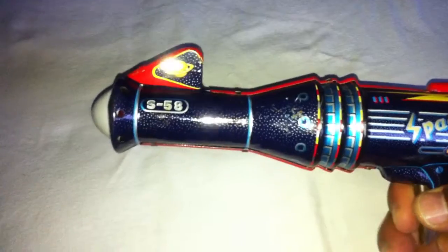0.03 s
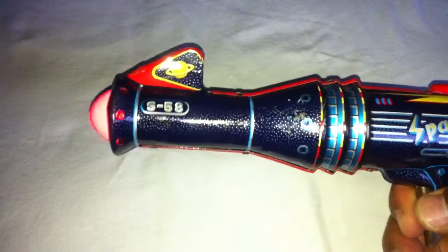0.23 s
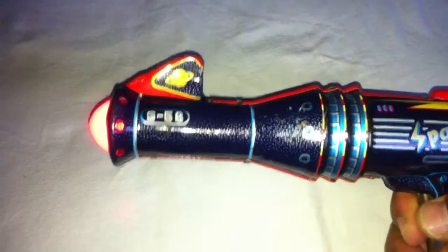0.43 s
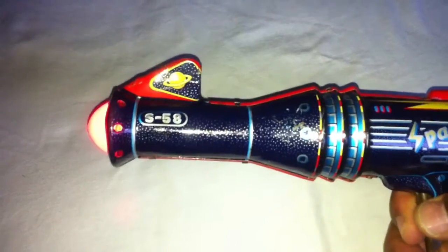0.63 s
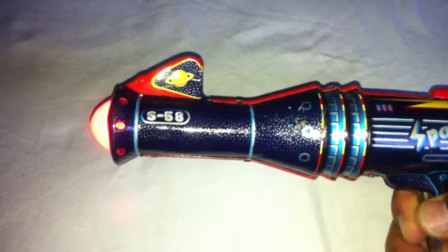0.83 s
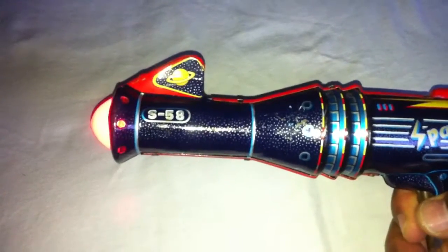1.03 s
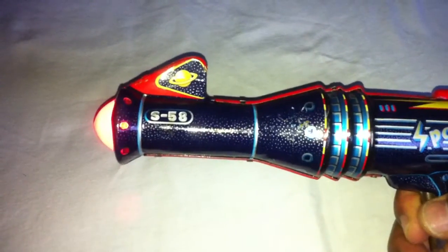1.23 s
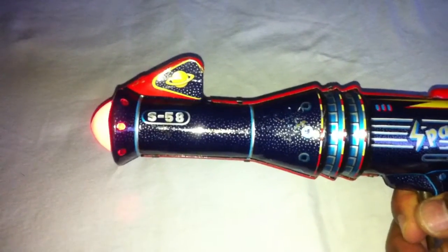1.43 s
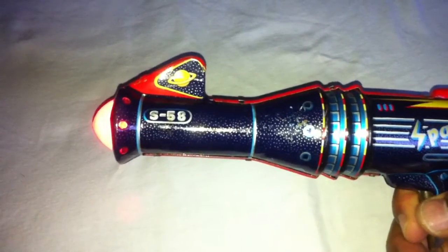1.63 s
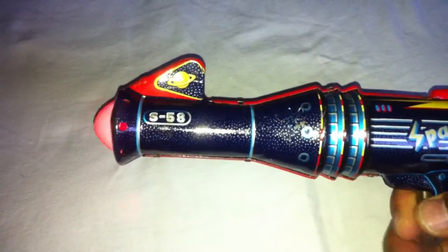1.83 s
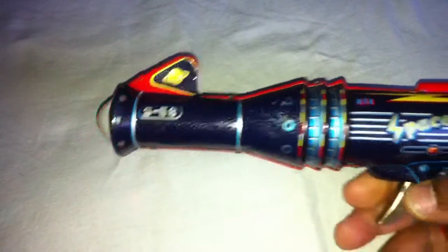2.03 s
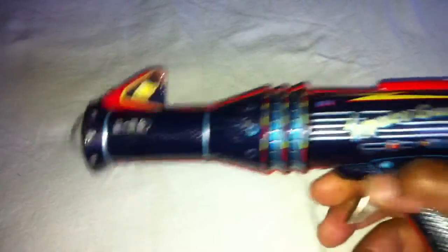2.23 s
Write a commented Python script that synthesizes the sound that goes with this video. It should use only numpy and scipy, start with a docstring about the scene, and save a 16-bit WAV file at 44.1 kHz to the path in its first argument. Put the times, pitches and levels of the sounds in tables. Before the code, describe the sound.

A tin toy gun makes a loud ratcheting rattle, close by in a small room. The trigger squeaks faintly at the start. From 0.2 seconds, sharp metallic snaps come haltingly over whirring gears, speeding up by 0.7 seconds into a fast, even clatter with a short tinny ring. The last snaps slow and stop at about 2 seconds, and the gears die away just after, leaving faint room hiss.

```python
"""In a small room, a tin toy gun is fired close by. The trigger squeaks faintly and spins a train of
whirring gears. A ratchet pawl (a small catch) scrapes off tooth after tooth and snaps against a tin
sounder, at first haltingly, then about 27 times a second, then stops. Every snap flutters back in fast
echoes and rings the tin shell. Soft air, a hum and a thin whine lie underneath, and an automatic
volume control turns everything down when the snaps begin."""
import sys
import numpy as np
from scipy import signal
from scipy.fft import rfft, irfft, next_fast_len
from scipy.io import wavfile
from scipy.ndimage import uniform_filter1d, minimum_filter1d, map_coordinates

SR = 44100
rng = np.random.default_rng(int(sys.argv[2]) if len(sys.argv) > 2 else 0)


def wav_record(signal):
    """Record a signal, one row per channel, as 16-bit PCM in the file named by sys.argv[1]."""
    frames = np.transpose(np.atleast_2d(signal))
    bounded = np.clip(frames, -1, 1)
    # unit amplitude maps onto the largest positive 16-bit level
    quanta = np.round(bounded * 32767).astype(np.int16)
    wavfile.write(sys.argv[1], SR, quanta)


N = 101429

# tone of the room's still air: pitch_hz, level_db
AIR_TONE = [(20, -43), (70, -27.5), (120, -14.5), (175, -12), (235, -6.5), (330, -17), (700, -19.5),
            (1670, -21.5), (3000, -29), (4500, -33), (9000, -37), (15000, -55)]
# a steady hum and a thin electrical whine: pitch_hz, level_db
HUM_AND_WHINE = [(176, -73.5), (15737, -71.5)]
# tone of the gears, also used for rubbing and scraping: pitch_hz, level_db
GEAR_TONE = [(40, -47.5), (200, -25), (550, -20.5), (900, -4), (1500, 4), (2500, 1.5), (3500, -4),
             (3950, 0), (4170, -6.5), (4400, 0), (4800, -3), (5120, -9), (5240, -5.5), (5440, -3.5),
             (5780, -6), (6000, -4), (8000, -7.5), (8350, -11.5), (8750, -3.5), (9150, -11.5), (12100, -13),
             (14200, -18), (14700, -10.5), (15700, -33.5)]
# how the whirr grows and fades: time_s, level_db
WHIRR_LEVELS = [(.06, -85), (.16, -63), (.205, -85), (.235, -39.5), (.32, -31), (.48, -29), (.62, -27),
                (.68, -28.5), (.72, -28), (1.0, -27.5), (1.5, -28), (1.869, -27), (1.96, -32),
                (2.02, -38.5), (2.066, -48), (2.10, -66.5), (2.161, -93)]
# light knocks of the trigger, compared with a snap: start_s, level_db
TRIGGER_KNOCKS = [(.171, -40.5), (2.268, -53)]
# snaps of the pawl: start_s
SNAP_TIMES = [0.2104, .3190, .3788, 0.4296, 0.5169, .5586, 0.5994, 0.639, 0.7161, 0.7553, 0.7934, 0.832,
              .8699, 0.9076, 0.9454, 0.9827, 1.0193, 1.0570, 1.0941, 1.1317, 1.1696, 1.2073, 1.2442, 1.2819,
              1.3193, 1.3573, 1.3945, 1.4327, 1.4704, 1.5086, 1.5468, 1.584, 1.6208, 1.657, 1.6936, 1.7304,
              1.7674, 1.8039, 1.8404, 1.878, 1.9241, 1.9972]
# tone of the struck tin sounder: pitch_hz, level_db
SOUNDER_TONE = [(40, -74), (250, -63.5), (480, -41.5), (680, -39), (830, -18.5), (1100, -7.5), (1350, -1.5),
                (1520, 4), (1680, 0), (1880, -16), (2200, -6.5), (2450, -2.5), (2800, -7.5), (3300, -6.5),
                (3520, -26.5), (4700, -34.5), (5400, -19.5), (6300, -34.5), (16000, -53.5)]
# notes that ring on after each snap, from the fluttering echo and tin shell: pitch_hz, level_db, fade_s
LINGERING_NOTES = [(825, -48, 0.26), (1046, -47.5, .16), (1274, -44, .15), (1482, -39, 0.17),
                   (1590, -43.5, .11), (1664, -33, 0.064), (2070, -43, 0.21), (2340, -32, .14),
                   (2540, -42, .12), (2830, -31.5, .14), (3182, -32, .09), (5180, -48, 0.1),
                   (5237, -42, 0.21)]
# how long the room rings (a fade is the time to drop 60 dB): pitch_hz, fade_s
ROOM_FADES = [(200, 0.5), (1500, 0.23), (4000, 0.25), (12000, 0.14)]


def amp(db):
    """Turn decibels into a number to multiply by."""
    return 10 ** (np.asarray(db) / 20)


def unit(x):
    """Scale a sound to an average (rms) level of 1."""
    return x / np.sqrt(np.mean(x ** 2) + 1e-20)


def at_pitch(table, hz):
    """Read between a table's rows on a logarithmic pitch scale."""
    pitches, values = np.transpose(table)
    return np.interp(np.log(hz + 1), np.log(pitches + 1), values)


def wobble(turns_per_s):
    """A smooth curve through random points."""
    points = rng.standard_normal(int(N * turns_per_s / SR) + 4)
    return map_coordinates(points, [np.arange(N) * turns_per_s / SR])


def tap_response(tone, size=4096):
    """How a body with this tone answers one sharp tap, scaled to energy 1."""
    cepstrum = irfft(np.log(amp(at_pitch(tone, np.fft.rfftfreq(size, 1 / SR)))))
    cepstrum[1:size // 2] *= 2  # fold it so that nothing sounds before the tap
    cepstrum[size // 2 + 1:] = 0
    answer = irfft(np.exp(rfft(cepstrum)))
    return answer / np.linalg.norm(answer)


def coloured(x, tone):
    """Pass a sound through a body with this tone."""
    return signal.fftconvolve(x, tap_response(tone))[:N]


def add(track, start_s, sound):
    """Mix a sound into the track."""
    part = track[max(round(start_s * SR), 0):][:len(sound)]
    part += sound[:len(part)]


def air_and_hum(air_db=-66):
    """The room's air hisses softly under a hum and an electrical whine."""
    t = np.arange(N) / SR
    air = amp(air_db) * unit(coloured(rng.standard_normal(N), AIR_TONE))
    hums = sum(amp(db) * unit(np.sin(2 * np.pi * hz * t + 0.41 * wobble(49))) for hz, db in HUM_AND_WHINE)
    return air + hums


def trigger_squeak(pitch_hz=3420, rise_hz_per_s=900, end_s=0.122, rub_db=-66):
    """The pulled trigger rubs and gives a thin rising squeak, gone before the first snap."""
    t = np.arange(N) / SR
    phase = 2 * np.pi * np.cumsum(pitch_hz + rise_hz_per_s * t) / SR + 0.53 * wobble(200)
    harmonics_db = [-68, -85, -86]
    squeak = sum(amp(db) * unit(np.sin(k * phase)) for k, db in enumerate(harmonics_db, 1))
    rub = amp(rub_db) * unit(coloured(rng.standard_normal(N), GEAR_TONE))
    return (squeak + rub) * np.clip((end_s - t) / 0.026, 0, 1)


def gear_whirr(ticks_per_s=1500, rub_share=0.46, casing_db=-7, casing_fade_s=0.054, size=4096):
    """Gear teeth tick and rub, and the tin casing rings briefly with them."""
    ticks = (rng.random(N) < ticks_per_s / SR) * amp(rng.normal(0, 2, N))
    ticks *= rng.choice([-1, 1], N)
    teeth = np.sqrt(1 - rub_share) * unit(ticks) + np.sqrt(rub_share) * rng.standard_normal(N)
    casing = rng.standard_normal(size) * amp(-60 * np.arange(size) / SR / casing_fade_s)
    ring = amp(casing_db) * signal.fftconvolve(teeth, casing / np.linalg.norm(casing))[:N]
    level_db = np.interp(np.arange(N) / SR, *np.transpose(WHIRR_LEVELS))
    level_db += 0.76 * wobble(120) + wobble(21.96)  # quick wavers and slower swells
    return amp(level_db) * unit(coloured(teeth + ring, GEAR_TONE))


def sounder_blow(hz, size, swell_hz=1415, width_hz=1076):
    """The sounder is struck, and its main ring swells a moment later."""
    resonance = swell_hz ** 2 - hz ** 2 + 1j * hz * width_hz
    lag = resonance.conj() / resonance  # delays pitches near swell_hz, keeps their level
    return rfft(tap_response(SOUNDER_TONE), size) * lag  # a spectrum: one value a pitch


def flutter_echoes(hz, trip_s=0.00481, first_db=-6.5, loss_db=4, count=24):
    """Sound bounces to and fro, losing strength after the second echo. Gives a spectrum."""
    echo_db = first_db - loss_db * np.maximum(np.arange(count) - 1, 0)
    echoes = amp(echo_db + rng.normal(0, 0.94, count))
    one_trip = np.exp(-2j * np.pi * trip_s * hz)
    return sum(echo * one_trip ** trips for trips, echo in enumerate(echoes, 1))


def lingering_ring(size, rise_s=0.0022):
    """Notes from the fluttering echo and the tin shell ring on, each fading at its own speed."""
    t = np.arange(size) / SR
    ring = sum(amp(db + rng.normal(0, 2.2) - 60 * t / fade_s) * np.sin(2 * np.pi * hz * t)
               for hz, db, fade_s in LINGERING_NOTES)
    return ring * (1 - np.exp(-t / rise_s))


def room_tail(size, delay_s=0.009):
    """The room's echoes blur into a tail of energy 1; high pitches die first."""
    hz, t, noise = signal.stft(rng.standard_normal(size), SR, nperseg=256)
    fade = amp(-60 * t / at_pitch(ROOM_FADES, hz)[:, None])
    tail = signal.istft(noise * fade, SR, nperseg=256)[1]
    tail = np.pad(tail, (round(delay_s * SR), 0))[:size]
    return tail / np.linalg.norm(tail)


def ratchet(blow_db=9.5, room_db=-12, steady_share=0.62, size=12288):
    """A spring gives every snap nearly the same force; the trigger knocks lightly before and after."""
    track, hz = np.zeros(N), np.fft.rfftfreq(size, 1 / SR)
    steady_tail = np.sqrt(steady_share) * room_tail(size)  # the part that is alike in every snap
    snaps = [(start_s, rng.normal(0, 0.22)) for start_s in SNAP_TIMES]
    for start_s, level_db in snaps + list(TRIGGER_KNOCKS):
        tail = steady_tail + np.sqrt(1 - steady_share) * room_tail(size)
        paths = 1 + flutter_echoes(hz) + amp(room_db) * rfft(tail)  # 1 is the direct sound
        blow = amp(blow_db) * irfft(sounder_blow(hz, size) * paths)
        add(track, start_s, amp(level_db) * (blow + lingering_ring(size)))
    return track


def pawl_scrape(level_db=-20, lead_s=0.00121, rise_s=0.00061, fade_s=0.034):
    """The pawl slips off each tooth with a short bright rasp that starts just before the snap."""
    loudness, t = np.zeros(N), np.arange(SR // 10) / SR
    shape = (1 - np.exp(-t / rise_s)) * amp(-60 * t / fade_s)
    for start_s in SNAP_TIMES:
        add(loudness, start_s - lead_s, amp(level_db + rng.normal(0, 0.66)) * shape)
    return coloured(loudness * rng.standard_normal(N), GEAR_TONE)


def scene():
    """The toy and the room, in one channel."""
    return (air_and_hum() + trigger_squeak() + gear_whirr() + ratchet() + pawl_scrape())[None]


def record(dry):
    """A volume control ducks at loud snaps and recovers slowly; the highest treble is cut off."""
    idle_gain_db, ceiling_db, recovery_db_per_s = 5.5, -10, 7.5
    window, top_hz = 128, 15800
    recovered_db = recovery_db_per_s * np.arange(N) / SR
    level_db = 10 * np.log10(np.abs(uniform_filter1d(dry[0] ** 2, window)) + 1e-12)
    held_db = np.maximum.accumulate(level_db + recovered_db) - recovered_db
    gain_db = np.minimum(idle_gain_db, ceiling_db - held_db)
    smooth_db = uniform_filter1d(minimum_filter1d(gain_db, 2 * window), 2 * window)
    size = next_fast_len(N + SR // 2)
    below_top = np.fft.rfftfreq(size, 1 / SR) < top_hz
    return irfft(rfft(dry * amp(smooth_db), size) * below_top, size)[..., :N]


dry = scene()
out = record(dry)
wav_record(out)
```